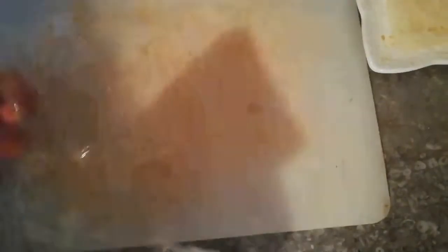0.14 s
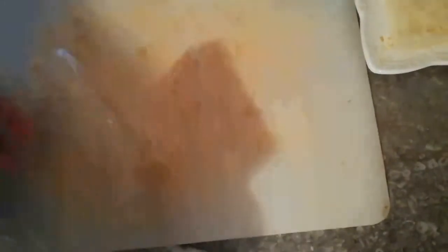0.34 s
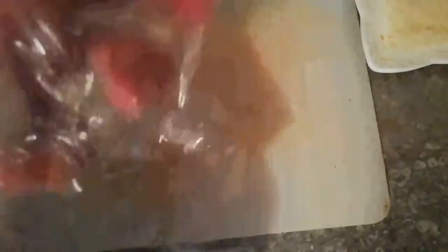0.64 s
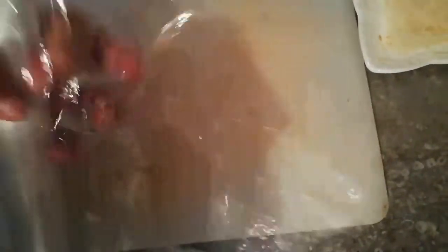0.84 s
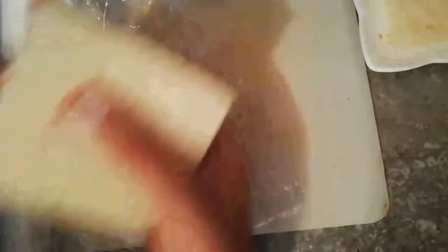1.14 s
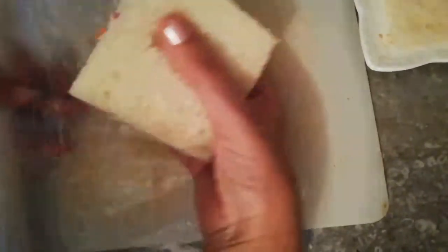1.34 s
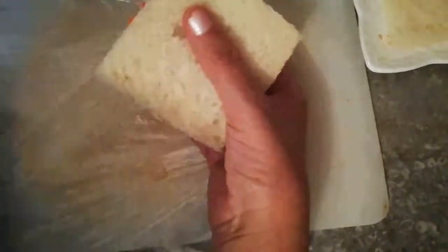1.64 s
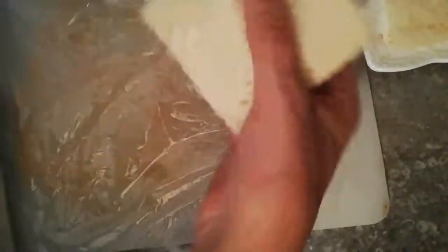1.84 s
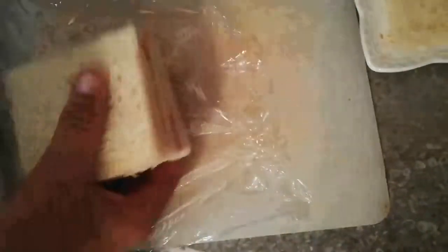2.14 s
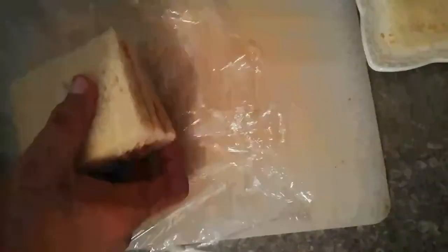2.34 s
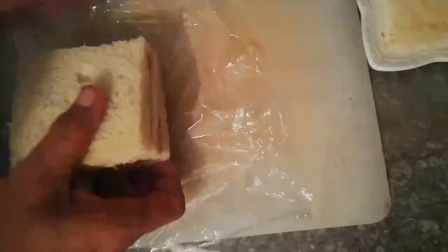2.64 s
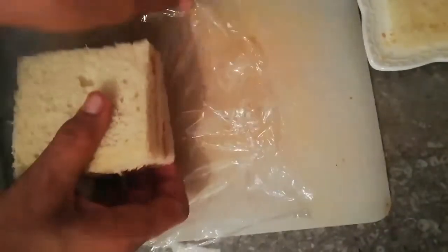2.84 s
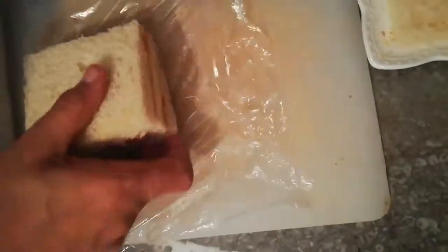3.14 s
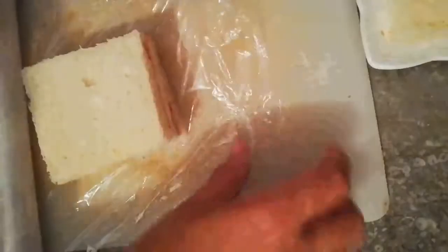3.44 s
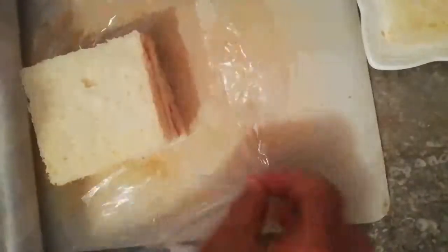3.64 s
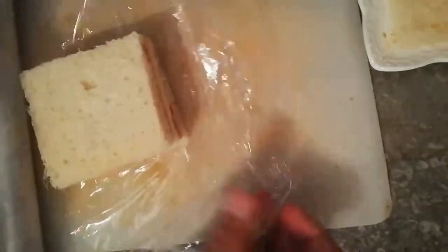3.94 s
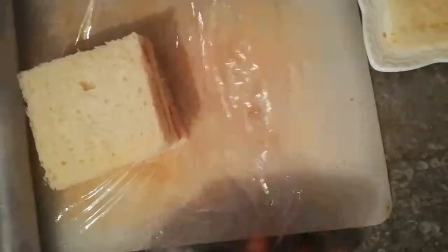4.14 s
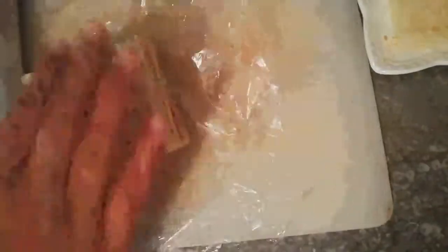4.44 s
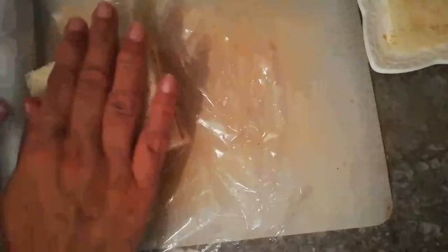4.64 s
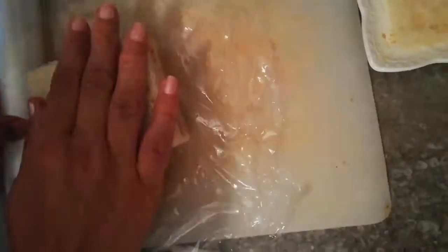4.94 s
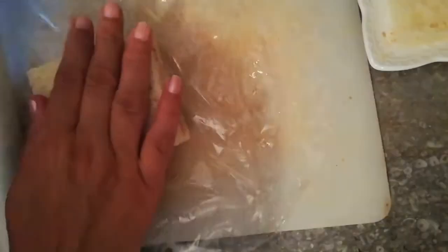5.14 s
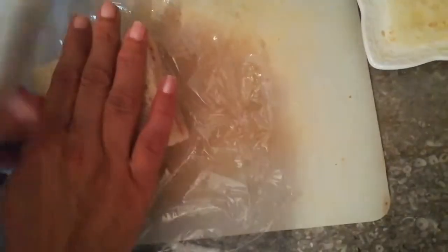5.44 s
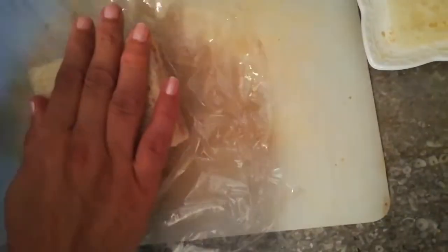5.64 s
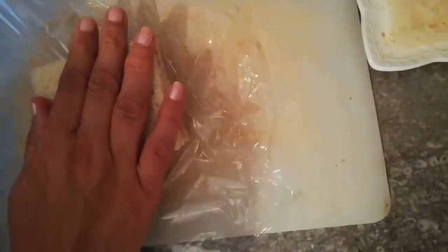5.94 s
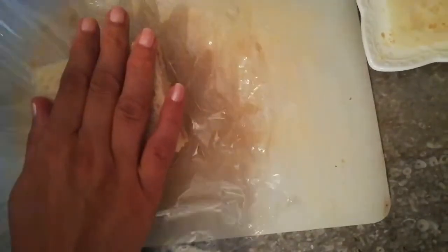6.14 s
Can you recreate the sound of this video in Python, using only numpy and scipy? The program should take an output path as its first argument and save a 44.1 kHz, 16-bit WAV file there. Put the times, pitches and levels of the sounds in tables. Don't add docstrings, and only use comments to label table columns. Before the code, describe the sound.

Thin plastic film crackles very close to a phone's stereo microphones, slightly left, in a kitchen with a short echo. From 0 to 1 second the crinkling is moderate and busy; a bowl lands at about 0.17 with a quick rattling ring, and clacks again at 0.88, brighter and with less ring, as the board scrapes. The film surges at 1.3 to 1.5, with the loudest sharp snap at 1.5. From 2 to 3.4 it is quieter and sparser, with dull woody knocks and low board jerks around 2.1 to 2.8. Tucking brings a burst at 4.0, a lull near 4.5, then crisp bursts from 5.0 to 5.7, with a hard snap at 5.45. Soft low thuds follow from 5.5 to 6.1 as the crackle fades. A faint vehicle drone passes from 3.5 to 5.2 over distant traffic, deep hum and light hiss.

```python
import sys
import numpy as np
from scipy import signal
from scipy.fft import rfft, irfft, next_fast_len
from scipy.io import wavfile
from scipy.ndimage import uniform_filter1d, map_coordinates

SR = 44100
rng = np.random.default_rng(int(sys.argv[2]) if len(sys.argv) > 2 else 0)


def attenuation_scalar(level_db):
    decades = np.asarray(level_db, float) / 20
    return 10 ** decades


def digitize_waveform(pressure):
    field = np.atleast_2d(pressure).T
    bounded = np.clip(field, -1, 1)
    quanta = np.round(bounded * 32767).astype(np.int16)
    wavfile.write(sys.argv[1], SR, quanta)


N = 277962

# peak_s, crackle_db, swell_s and sink_s (time
# per 10 dB), flex_over_crackle_db
HAND_GRIPS = [(0.014, -40.6, 0.027, 0.04, -12.1), (0.095, -44.5, 0.056, 0.015, -14.6),
              (0.185, -42.0, 0.01, 0.03, -15.0), (0.263, -39.7, 0.158, 0.106, -17.1),
              (0.483, -42.2, 0.067, 0.081, -14.1), (0.65, -45.7, 0.094, 0.124, -12.9),
              (0.88, -47.3, 0.149, 0.103, -15.6), (1.243, -49.3, 0.012, 0.163, -1.9),
              (1.343, -33.2, 0.047, 0.135, -18.7), (1.4, -39.6, 0.03, 0.04, -12.8),
              (1.493, -29.8, 0.096, 0.071, -9.2), (1.693, -48.4, 0.021, 0.088, -13.7),
              (2.086, -57.0, 0.008, 0.047, -8.1), (2.236, -50.9, 0.024, 0.083, -10.4),
              (2.329, -47.3, 0.016, 0.045, -14.8), (2.523, -59.0, 0.187, 0.032, -10.4),
              (2.756, -50.0, 0.034, 0.248, -7.6), (2.892, -42.4, 0.062, 0.044, -17.4),
              (2.97, -42.9, 0.056, 0.075, -12.3), (3.133, -50.2, 0.031, 0.021, -18.7),
              (3.238, -48.2, 0.108, 0.09, -6.3), (3.4, -52.7, 0.2, 0.008, -14.5),
              (3.458, -44.4, 0.005, 0.08, -2.3), (3.56, -44.2, 0.06, 0.143, -4.4),
                 (3.642, -44.8, 0.042, 0.199, -10.7), (3.812, -42.6, 0.126, 0.046, -14.5),
                 (3.965, -39.2, 0.028, 0.058, -13.8), (4.045, -31.1, 0.024, 0.034, -8.6),
                 (4.55, -63.9, 0.2, 0.03, -2.3), (4.602, -44.1, 0.008, 0.075, -4.0),
                 (4.755, -55.7, 0.02, 0.1, 6.3), (4.891, -48.9, 0.019, 0.062, -8.8),
                 (5.026, -42.0, 0.012, 0.131, -7.0), (5.093, -35.1, 0.027, 0.026, -21.3),
                 (5.173, -48.2, 0.008, 0.031, -4.1), (5.306, -35.9, 0.059, 0.023, -10.4),
                 (5.448, -29.0, 0.016, 0.018, -9.7), (5.499, -48.3, 0.37, 0.224, -7.2),
                 (5.578, -43.1, 0.01, 0.015, -7.9), (5.628, -38.2, 0.08, 0.017, -13.1),
                 (5.703, -46.0, 0.318, 0.033, -8.5), (5.82, -62.2, 0.03, 0.05, -8.0),
                 (5.947, -57.4, 0.014, 0.21, -7.7), (6.094, -50.2, 0.021, 0.222, -7.2)]
# start_s, peak_db, low_part_db
LOUD_CREASES = [(0.1795, -20.7, 4.7), (0.2443, -23.8, -8.2), (0.3401, -23.3, -20.7), (0.4229, -20.0, -27.0),
                (0.6005, -26.4, -29.6), (0.6205, -34.1, -19.9), (0.6818, -20.6, -25.4),
                (0.848, -29.3, -17.7), (1.287, -22.8, -21.2), (1.3259, -17.7, -27.3), (1.4935, -4.5, -29.5),
                (2.0837, -25.7, -17.3), (2.2593, -30.9, -29.1), (2.7611, -30.0, -11.0),
                (2.8903, -21.2, -30.8), (2.9562, -25.0, -26.0), (3.1308, -28.5, -27.5),
                (3.71, -30.1, -17.9), (3.7958, -22.8, -28.2), (3.8561, -24.0, -35.0),
                (3.9529, -26.1, -23.9), (4.0337, -22.4, -20.6), (4.6039, -29.9, -9.1), (5.021, -32.0, -9.0),
                (5.0898, -21.3, -24.7), (5.2864, -22.0, -20.0), (5.4026, -23.1, -14.9),
                (5.449, -11.8, -24.2), (5.5767, -21.3, -15.7), (5.6126, -15.2, -30.8)]
STRAY_DB, STRAY_SCATTER_DB, STRAY_LOW_DB = 13.5, 3, -20.5
# pitch_hz, level_db (per Hz)
CREASE_COLOUR = [(1470, -37), (2600, -15.5), (3410, -6.5), (3980, -11.5), (5390, -8.5), (7020, -7),
                 (9220, -3), (10100, 0.5), (14600, -17), (15500, -18.5), (16000, -52)]
# pitch_hz, level_db (per Hz)
SHEET_COLOUR = [(260, -45), (450, -9.5), (541, -10), (623, -8.5), (1060, 0.5), (1400, 1.5), (1900, 3),
                (2550, -7), (3970, -3.5), (6000, -6.5), (7800, -27), (13200, -120)]
# start_s, left_minus_right_db
HAND_SIDES = [(0.0, 5.5), (0.12, 5.5), (0.54, 4.5), (1.0, 8), (1.16, 5.5), (3.89, 6.5), (4.54, 2.5),
              (5.49, 3.5), (5.89, 4.5), (6.3, 7)]

# start_s, level_db
TRAFFIC_LEVEL = [(0.0, -64), (0.63, -71), (1.47, -61), (2.3, -72.5), (2.67, -64.5), (3.03, -62),
                 (3.86, -66.5), (4.35, -69.5), (5.3, -67), (6.3, -71.5)]
# pitch_hz, level_db (per Hz)
DEEP_COLOUR = [(8.8, -25), (15, -1.5), (32, -0.5), (64, -8.5), (96, -11), (130, -15), (170, -49),
               (290, -120)]
# pitch_hz, level_db (per Hz)
TRAFFIC_COLOUR = [(53, -29), (90, -0.5), (221, -6), (263, -8), (367, -9.5), (410, -19.5), (600, -28.5),
                  (780, -60), (1320, -120)]
# pitch_hz, level_db (per Hz)
HISS_COLOUR = [(240, -21), (400, 1.5), (562, -2.5), (949, -0.5), (1110, 0), (1230, -1), (3160, -3.5),
               (6850, -8), (9610, -6), (14600, -14), (16000, -44.5)]
DEEP_DB, DEEP_SWAY_DB, HISS_DB = -63.5, 1.7, -67
# pitch_hz, likeness (-1 to 1)
PORT_LIKENESS = [(60, 0.96), (130, 0.96), (290, 0.426), (640, -0.81), (1410, 0.36), (3100, -0.215),
                 (6820, -0.27), (15000, 0.15)]

# start_s, peak_db, ring_share_db, brightness_db (per octave)
BOWL_CONTACTS = [
    (.17, -23.5, 2.5, 0.5),
    (.178, -18, 0.7, -0.5),
    (.188, -22.5, 2, -1),
    (.193, -23, -2.5, 3),
    (.88, -27.5, -14, 4),
    (.884, -18.5, -17.5, 16),
    (.89, -23.5, -20, 4),
    (.908, -30, -20, 4),
]
# pitch_hz, level_db, t60_s
BOWL_MODES = [(707, -15, 0.28), (716, -13, 0.25), (979, -10, 0.18), (1013, -15, 0.3), (1294, -12, 0.18),
              (1665.4, -3, 0.31), (1695, -9, 0.31), (1885, -7, 0.097), (2772, -13, 0.62), (2792, -8, 0.4),
              (4120, -12, 0.237), (5700, -6.5, 0.1), (7490, -12, 0.11), (9100, -14, 0.08)]
# pitch_hz, level_db (per Hz)
TABLE_COLOUR = [(100, -32.5), (250, -13.5), (550, -17.5), (700, -6.5), (1000, -4.5), (1400, -9),
                (1850, -2.5), (2250, -17), (3500, -17), (6000, -25.5), (9000, -29), (12000, -59)]

# start_s, level_db
BOARD_SHOVES = [(.31, -54), (.62, -54.5), (.885, -45), (2.14, -51.5), (2.431, -47.5), (2.461, -47.5),
                (2.475, -48), (2.52, -47.5), (2.55, -60), (5.27, -58), (5.339, -56), (5.41, -52),
                (5.5, -49), (5.57, -51)]
# pitch_hz, level_db (per Hz)
BOARD_COLOUR = [(80, -27), (130, 4), (215, -1), (320, -3), (400, -7), (480, -28.5)]
# start_s, peak_db, pitch_hz, thump_db
WORKTOP_KNOCKS = [(1.234, -40.5, 1117, -11.5), (1.739, -39.5, 749.3, -4.5), (1.835, -45.5, 732, -22),
                  (2.085, -40, 733, -10), (2.117, -43.5, 757, -11), (2.77, -35.5, 966, -16),
                  (2.795, -43.5, 1895, -9), (3.455, -43, 1003, -11), (3.484, -41.5, 1948, -11),
                  (4.057, -54, 1784, -28), (4.556, -48.5, 718, -25.5), (4.607, -40, 1890, -28.5),
                  (4.73, -48, 1788, -20), (4.749, -41, 1750, -12), (5.03, -40, 1825, -30),
                  (5.447, -36.5, 1067, -17), (5.577, -38.5, 1946, -18), (5.941, -54, 2030, -9)]
# multiple_of_pitch, level_db, t60_s
WOOD_MODES = [(1.01, -2.5, 0.042), (.6, -6.5, 0.026), (1.35, -2.5, 0.028), (1.75, -5, 0.037),
              (2.4, -7, 0.022)]
# start_s, peak_db, pitch_hz, t60_s
COUNTER_THUDS = [(2.59, -54, 125, 0.218), (3.479, -47, 118.6, 0.18), (5.496, -41, 89, 0.1),
                 (5.534, -39.5, 87, 0.14), (5.795, -41, 65, 0.2), (5.941, -42, 51.6, 0.37),
                 (6.13, -45.5, 69.7, 0.096)]
# start_s, firing_hz, level_db
ENGINE_PASS = [(3.5, 133.7, -57), (3.602, 138, -71), (3.708, 159, -62), (4.434, 160.1, -73),
               (4.532, 143.8, -63.5), (5.25, 116.4, -63.5)]

# pitch_hz, t60_s
KITCHEN_ECHO = [(200, 0.45), (1000, 0.38), (4000, 0.38), (12000, 0.056)]
# pitch_hz, left_minus_right_db
PORT_COLOUR = [(60, 0), (200, -1), (380, -4), (700, 8), (1200, -1.5), (1900, -8), (2600, -1), (4400, -3.5),
               (6500, -1.5), (9500, 8), (12500, 3), (15000, 5)]


def unit(x):
    return x / np.sqrt(np.mean(x ** 2) + 1e-20)


def along(points, hz):
    f, v = np.transpose(points)
    return np.interp(np.log(hz + 1), np.log(f + 1), v)


def curves(rows):
    s, *cols = np.transpose(rows)
    return [np.interp(np.arange(N) / SR, s, c) for c in cols]


def wobble(rate):
    knots = rng.standard_normal(int(N * rate / SR) + 4)
    return map_coordinates(knots, [np.arange(N) * rate / SR])


def coloured(x, spectrum):
    gain = attenuation_scalar(along(spectrum, np.fft.rfftfreq(4096, 1 / SR)))
    cepstrum = irfft(np.log(gain + 1e-4))
    cepstrum[1:2048] *= 2
    cepstrum[2049:] = 0
    pulse = irfft(np.exp(rfft(cepstrum)))
    return signal.fftconvolve(x, pulse[None] / np.linalg.norm(pulse), axes=1)[:, :N]


def bursts(times, sizes, pan_db, t60, lag, spread, size=64):
    shape = rng.standard_normal((len(times), size + 1))
    late = np.round(lag + spread * shape[:, 0]).astype(int)
    fade = attenuation_scalar(-60 * np.arange(size) / SR / t60)
    body = shape[:, 1:] * fade
    body *= (sizes * np.linalg.norm(fade) / np.linalg.norm(body, axis=1))[:, None]
    start = np.round(times * SR).astype(int)[:, None] + np.arange(size)
    ports = []
    for at, db in [(start + late[:, None], pan_db / 2), (start, -pan_db / 2)]:
        heard = body * attenuation_scalar(db)[:, None]
        ports.append(np.bincount(np.clip(at, 0, N).ravel(), heard.ravel(), N + 1)[:N])
    return np.array(ports)


def effort():
    grips = np.array(HAND_GRIPS)
    s, db, swell, sink, flex_db = np.transpose(grips)[:, :, None]
    t = np.arange(0, N + 64, 64) / SR
    crackle_db = db - 10 * np.maximum((s - t) / np.abs(swell), (t - s) / np.abs(sink))
    gains = []
    for level_db in (crackle_db, crackle_db + flex_db):
        gain = np.sqrt(np.sum(attenuation_scalar(2 * level_db), axis=0))
        gains.append(np.interp(np.arange(N) / SR, t, gain))
    return gains


def crackle(count, scatter_db, clump_db, t60):
    row = rng.random((count, 3))
    times = row[:, 0] * (N - 1) / SR
    clumping = 0.16 * wobble(15) + 0.75 * wobble(45) + 0.52 * wobble(220)
    clumps = clump_db * clumping[(times * SR).astype(int)]
    sizes = attenuation_scalar(np.minimum(-scatter_db * np.log(1 - row[:, 1]), 15) + clumps)
    return unit(bursts(times, sizes, 6 * (row[:, 2] - .5), t60, lag=-19, spread=4, size=32))


def strays(crisp_gain, count):
    row = rng.random((count, 3))
    s = row[:, 0] * (N - 1) / SR
    grip_db = 20 * np.log10(crisp_gain[(s * SR).astype(int)])
    db = grip_db + STRAY_DB - STRAY_SCATTER_DB * np.log(1 - .95 * row[:, 1])
    return np.transpose([s, db, STRAY_LOW_DB + 12 * (row[:, 2] - .5)])


def film():
    crisp_gain, sheet_gain = effort()
    pan_db, = curves(HAND_SIDES)
    sides = attenuation_scalar(np.outer([.5, -.5], pan_db - np.mean(pan_db)))
    crisp = attenuation_scalar(0.67) * crisp_gain * crackle(count=22000, scatter_db=1.0, clump_db=2.5, t60=0.0019)
    sheet = attenuation_scalar(1.5) * sheet_gain * crackle(count=9000, scatter_db=3, clump_db=3.0, t60=0.0022)
    s, db, low_db = np.vstack([LOUD_CREASES, strays(crisp_gain, count=70)]).T
    snap = bursts(s, attenuation_scalar(db - 2), 0 * s, 0.0034, lag=-19, spread=4, size=192)
    flex = bursts(s, attenuation_scalar(db + low_db - 5.5), 0 * s, 0.0072, lag=-16.5, spread=8.7, size=256)
    return coloured(sides * (crisp + snap), CREASE_COLOUR) + coloured(sheet + flex, SHEET_COLOUR)


def rush(spectrum, patchy_db):
    hz, _, z = signal.stft(rng.standard_normal((2, N + 4096)), SR, nperseg=2048)
    patches = uniform_filter1d(rng.standard_normal(z.shape[1:]), 4, axis=0)
    patches = uniform_filter1d(patches, 3, axis=1)
    turn = np.arccos(np.clip(along(PORT_LIKENESS, hz), -1, 1))[:, None] / 2
    gain = attenuation_scalar(patchy_db * unit(patches) + along(spectrum, hz)[:, None])
    shares = [np.cos(turn), np.sin(turn)]
    mid, side = signal.istft(z * gain * shares, SR, nperseg=2048)[1][:, :N]
    return unit(np.array([mid + side, mid - side]))


def background():
    traffic_db, = curves(TRAFFIC_LEVEL)
    hum = attenuation_scalar(DEEP_DB + 3.5 + DEEP_SWAY_DB * wobble(1.4)) * rush(DEEP_COLOUR, patchy_db=1.5)
    traffic = attenuation_scalar(traffic_db + 3.5) * rush(TRAFFIC_COLOUR, patchy_db=3.5)
    return hum + traffic + attenuation_scalar(HISS_DB + 3.0) * rush(HISS_COLOUR, patchy_db=1.4)


def bowl():
    ring, t = np.zeros((2, N + SR)), np.arange(SR // 2) / SR
    for s, db, ring_db, bright_db in BOWL_CONTACTS:
        for hz, mode_db, t60 in BOWL_MODES:
            turn = rng.uniform(0, 2 * np.pi) + 0.9 * rng.standard_normal(2)[:, None]
            tilt_db = bright_db * np.clip(np.log2(hz / 1700), -.5, .7)
            fade = attenuation_scalar(db + ring_db + tilt_db + mode_db - 11.5 - 60 * t / t60)
            ring[:, round(s * SR):][:, :len(t)] += fade * np.sin(2 * np.pi * hz * t + turn)
    rocking = attenuation_scalar(4.2 * np.array([wobble(35.0), wobble(35.1)]))
    s, db, *_ = np.transpose(BOWL_CONTACTS)
    blow = bursts(s, attenuation_scalar(db - 3.5), -3 + 0 * s, 0.033, lag=-13.5, spread=3, size=1024)
    rattle = bursts(s, attenuation_scalar(db - 17.5), -3 + 0 * s, 0.248, lag=-15.5, spread=4.0, size=9000)
    return rocking * attenuation_scalar([[-1.5], [1.5]]) * ring[:, :N], coloured(blow + rattle, TABLE_COLOUR)


def shoves():
    s, db = np.transpose(BOARD_SHOVES)
    puffs = bursts(s, attenuation_scalar(db - 3), 0 * s, 0.16, lag=-15, spread=3, size=4000)
    return coloured(puffs, BOARD_COLOUR)


def knocks():
    out, t = np.zeros((2, N + SR)), np.arange(SR // 8) / SR
    multiple, level_db, t60 = np.transpose(WOOD_MODES)[:, :, None]
    attack = 1 - np.exp(-t / 0.00064)
    for s, db, hz, thump_db in WORKTOP_KNOCKS:
        modes = hz * multiple * (1 + 0.041 * rng.standard_normal(t60.shape))
        turns = 1.84 * rng.random((2, *t60.shape))
        body = np.sum(attenuation_scalar(level_db - 60 * t / t60) * np.sin(2 * np.pi * modes * t + turns), axis=1)
        thump = attenuation_scalar(thump_db + 4.5 - 60 * t / 0.041) * np.sin(2 * np.pi * 260 * t)
        out[:, round(s * SR):][:, :len(t)] += attenuation_scalar(db + 1.24) * (body + thump) * attack
    s, db, *_ = np.transpose(WORKTOP_KNOCKS)
    crack = bursts(s, attenuation_scalar(db - 5), 0 * s, 0.065, lag=-16.5, spread=4.9, size=2048)
    return out[:, :N] + coloured(crack, TABLE_COLOUR)


def thuds():
    out, t = np.zeros(N + SR), np.arange(SR // 2) / SR
    attack = 1 - np.exp(-t / 0.008)
    for s, db, hz, t60 in COUNTER_THUDS:
        swing = -np.sin(2 * np.pi * hz * t)
        out[round(s * SR):][:len(t)] += attenuation_scalar(db + 4.5 - 60 * t / t60) * swing * attack
    return out[:N]


def engine():
    hz, db = curves(ENGINE_PASS)
    t = np.arange(N) / SR
    first_s, last_s = ENGINE_PASS[0][0], ENGINE_PASS[-1][0]
    near = np.clip(np.minimum(t - first_s, last_s - t) / 0.175, 0, 1)
    turn = 2 * np.pi * np.cumsum(hz * (1 + 0.015 * wobble(15))) / SR
    tone = np.sin(turn) + 0.37 * np.sin(1.45 * turn)
    return near * attenuation_scalar(db + 1.32 + 2.1 * wobble(8.8)) * tone


def room(x):
    wet, step = np.zeros((2, N + 2 * SR)), SR // 3
    for at in range(0, N, step):
        hz, t, z = signal.stft(rng.standard_normal((2, SR // 2)), SR, nperseg=256)
        fade = attenuation_scalar(-60 * t / along(KITCHEN_ECHO, hz)[:, None])
        tail = signal.istft(z * fade, SR, nperseg=256)[1]
        piece = signal.fftconvolve(x[:, at:at + step], tail / np.linalg.norm(tail[0]), axes=1)
        wet[:, at + 200:at + 200 + piece.shape[1]] += piece
    return wet[:, :N]


def scene():
    near, (ring, bang), taps = film(), bowl(), knocks()
    wet = room(attenuation_scalar(-10.5) * near + attenuation_scalar(-9.0) * ring + attenuation_scalar(-8) * bang + attenuation_scalar(-7.5) * taps)
    objects = near + ring + bang + taps + wet
    ported = []
    for k, side in enumerate((1, -1)):
        colour = [(hz, side * db / 2) for hz, db in PORT_COLOUR]
        ported.append(coloured(objects[[k]], colour)[0])
    return np.array(ported) * attenuation_scalar([[1.5], [-2.5]]) + thuds() + shoves() + engine() + background()


def low_pass(x):
    return signal.sosfilt(signal.butter(12, 16470, fs=SR, output="sos"), x)


def record(dry):
    top_hz = 15850
    size = next_fast_len(N)
    passed = np.fft.rfftfreq(size, 1 / SR) < top_hz
    kept = irfft(rfft(dry, size) * passed, size)[:, :N]
    return low_pass(kept)


dry = scene()
out = record(dry)
digitize_waveform(out)
```